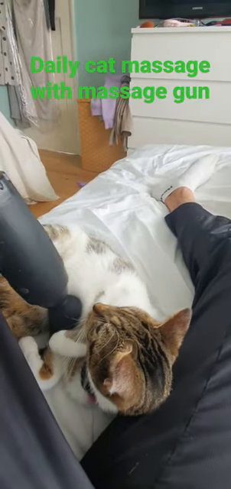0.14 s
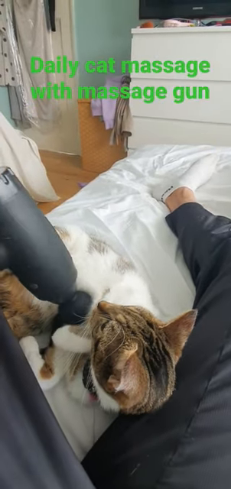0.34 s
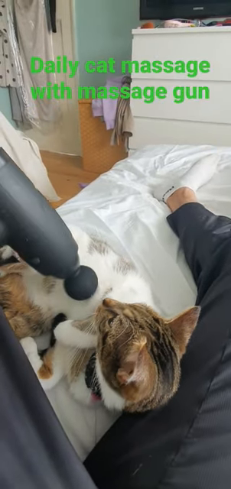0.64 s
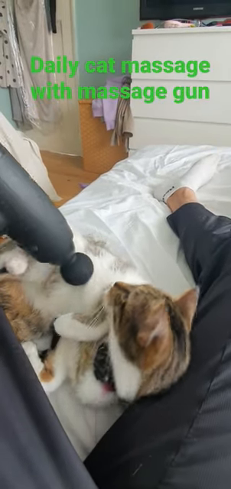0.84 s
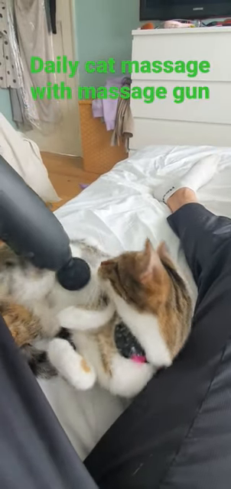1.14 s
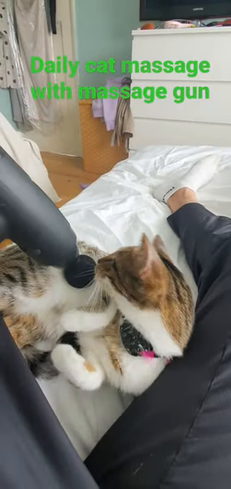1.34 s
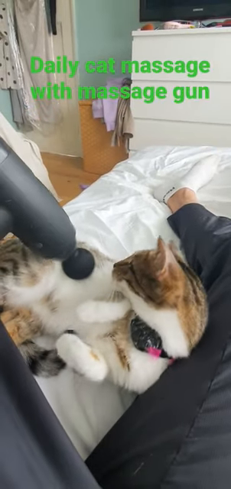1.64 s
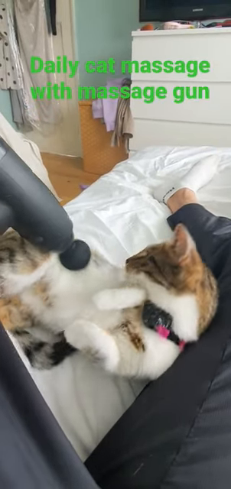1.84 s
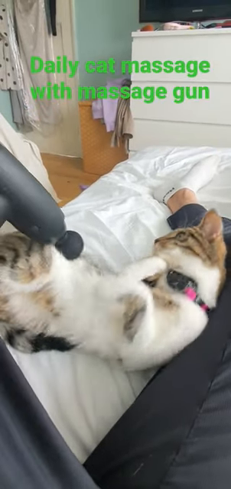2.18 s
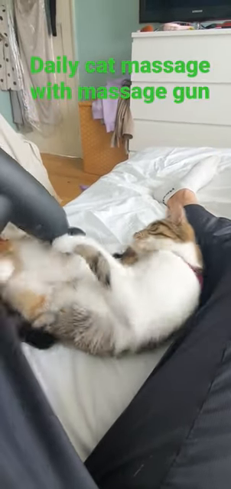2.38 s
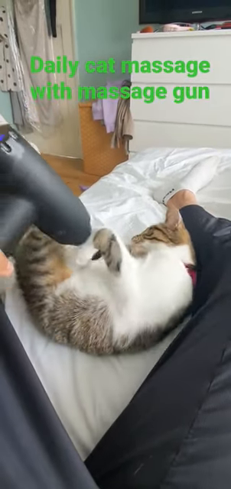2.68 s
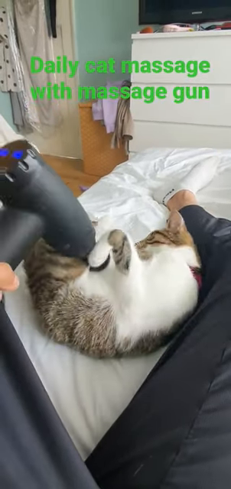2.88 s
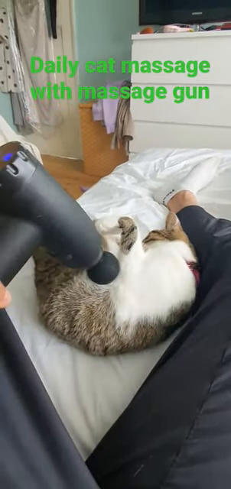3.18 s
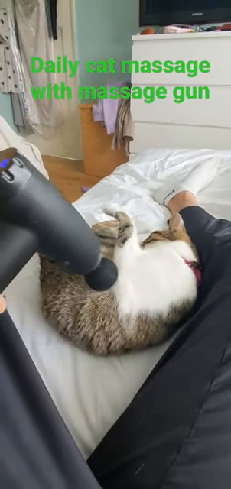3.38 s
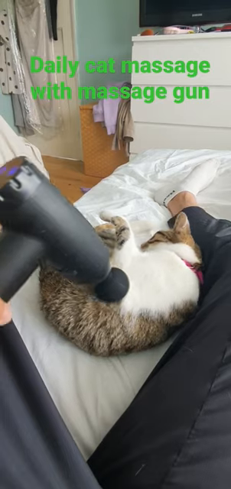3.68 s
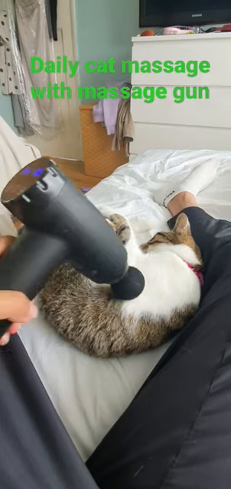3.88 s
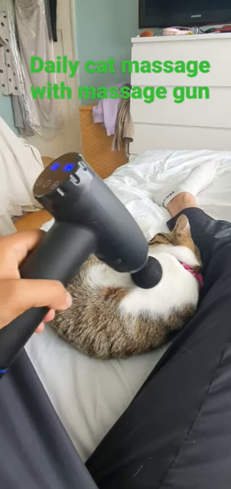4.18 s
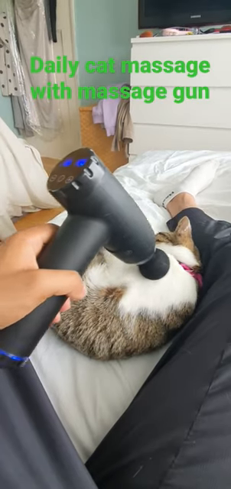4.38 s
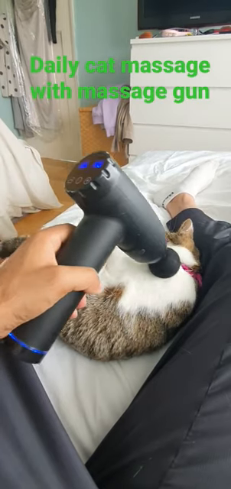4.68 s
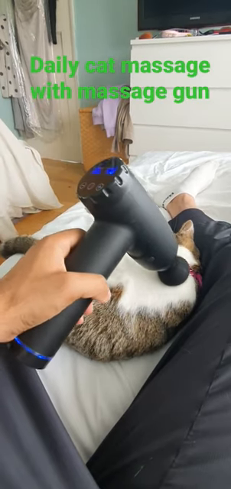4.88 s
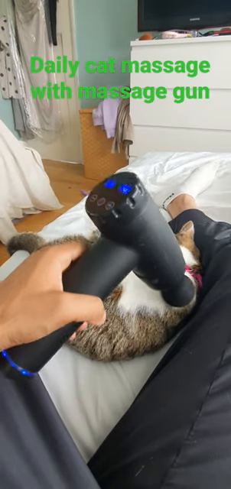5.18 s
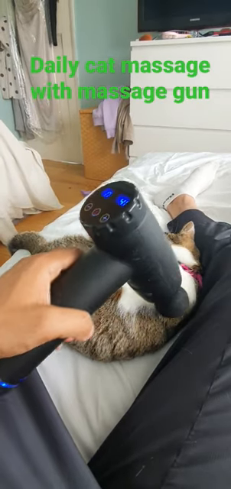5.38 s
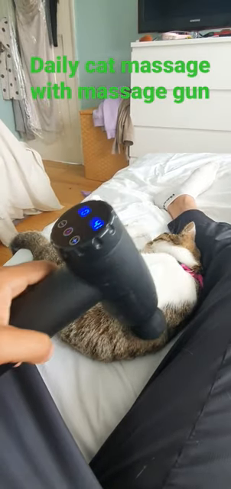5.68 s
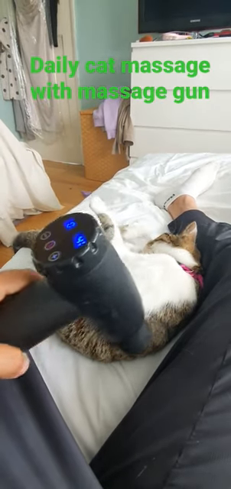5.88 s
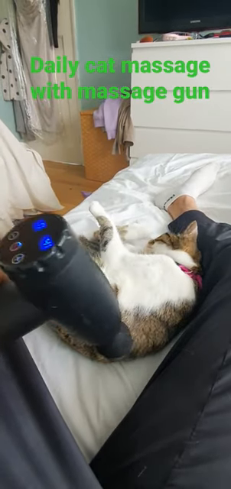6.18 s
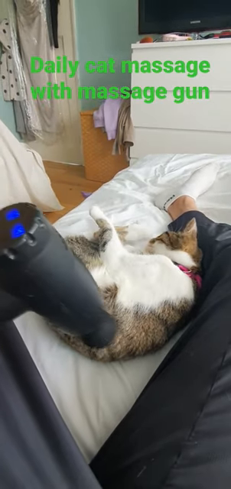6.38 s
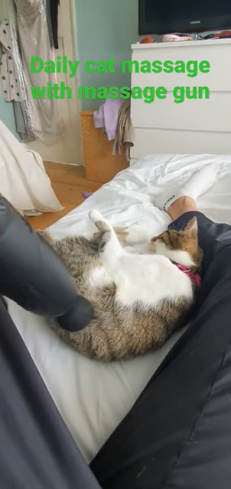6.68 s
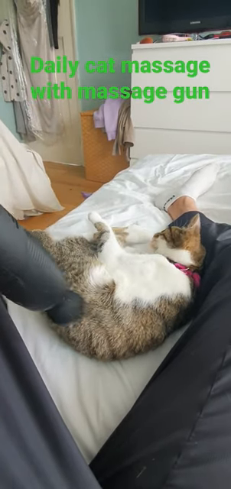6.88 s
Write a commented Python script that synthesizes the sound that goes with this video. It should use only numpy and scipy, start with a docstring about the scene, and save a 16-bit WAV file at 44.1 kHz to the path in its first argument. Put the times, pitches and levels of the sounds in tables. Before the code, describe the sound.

A massage gun runs throughout, close to a phone microphone in a small, soft bedroom. Its buzzy hum flutters about thirty times a second and wavers slightly in speed. Just after one second the head catches in a quick run of slaps; around two and a half seconds bedding rustles and crackles as a cat rolls, followed by a tiny snap and a harder clacking burst near three. Afterwards the hum continues, its whine brighter near the end.

```python
"""A massage gun hums at about 31 strokes a second while it is moved over a cat on a bed.
Its crank drives all its tones: the speed hunts up and down, and the gears rattle once a turn.
Twice the ball head catches and slaps in time with the strokes: decaying modes, with a short room tail.
The cat rolls over on the bedding: shaped noise hisses, crackles and gives a small snap.
A phone listens from close by in a bedroom, through two ports and a band limit."""
import sys
import numpy as np
from scipy import signal
from scipy.fft import rfft, irfft
from scipy.io import wavfile

SR = 44100
rng = np.random.default_rng(int(sys.argv[2]) if len(sys.argv) > 2 else 0)


def inscribe(sig):
    """Save sig as 16-bit PCM at rate SR to the path in sys.argv[1].

    A 1-D sig is mono; a 2-D sig holds one channel per row.
    Samples are clipped to [-1, 1] before scaling.
    """
    pcm = np.round(np.clip(np.atleast_2d(sig).T, -1, 1) * 32767)
    wavfile.write(sys.argv[1], SR, pcm.astype(np.int16))


N = 310464
TIME = np.arange(N) / SR

# crank speed under a hunting control: time_s, mean_turns_per_s, hunt_depth_turns_per_s, hunts_per_s
SPEED_HUNTING = [(0.0, 31.8, 0.59, 3.16), (0.52, 31.18, 0.03, 3.57), (0.96, 31.63, 0.5, 3.0),
                 (1.4, 31.05, 0.11, 3.73), (1.49, 32.02, 0.11, 3.85), (1.94, 31.27, 0.54, 2.78),
                 (2.37, 31.77, 0.3, 4.07), (2.69, 31.54, 1.01, 2.88), (3.13, 31.24, 0.0, 3.89),
                 (3.44, 31.58, 0.53, 3.01), (4.11, 31.5, 0.32, 3.43), (4.66, 31.32, 0.38, 3.35),
                 (5.19, 31.87, 0.36, 3.22), (5.52, 31.12, 0.05, 3.69), (5.85, 31.75, 0.47, 3.43),
                 (7.04, 31.7, 0.33, 3.05)]
# how the gun is held: time_s, nearness_gain_db (each tone takes a share), housing_turn (about -1 to 1)
GUN_POSE = [(0, 1.5, 0.33), (.45, 2.5, 0.11), (.9, -1.5, -0.035), (1.6, -3, 0.28), (2.1, -4, -0.54),
            (3, -3, -0.59), (3.7, -1.5, 0.38), (4.8, -5.5, -0.066), (5.8, 2, -0.39), (6.4, 4, -0.63),
            (7.04, 2, -0.45)]
# phase lead of the left port over the right: freq_hz, lead_rad
PORT_LEAD = [(100, -.1), (315, .3), (590, -.6), (630, 1.6), (662, 0), (720, 1.6), (755, -.3), (790, .5),
             (830, 2), (1350, 1.2), (1550, 0), (3450, 1.4)]


def amp(db):
    """Decibels to gain."""
    return 10 ** (np.asarray(db) / 20)


def evened(x):
    """Scales to rms 1."""
    return x / np.sqrt(np.mean(x ** 2) + 1e-20)


def read(points, hz):
    """Reads a table on a log-frequency axis."""
    f, value = np.transpose(points)
    return np.interp(np.log(hz + 1), np.log(f + 1), value)


def curves(rows):
    """Every column of a time table, at each sample."""
    s, *columns = np.transpose(rows)
    return [np.interp(TIME, s, c) for c in columns]


def swells(rows):
    """Summed gain of gestures that each swell and fade like a bell curve."""
    return sum(amp(db) * np.exp(-((TIME - mid_s) / half_s) ** 2) for mid_s, db, half_s in rows)


def add(mix, s, sound):
    """Mixes a stereo sound in at time s."""
    part = mix[:, round(s * SR):][:, :sound.shape[1]]
    part += sound[:, :part.shape[1]]


def pan(left_db):
    """Gains of the two ports for a left-right level difference."""
    return amp([[left_db / 2], [-left_db / 2]])


def noise(spectrum, same):
    """Coloured stereo noise of rms 1; same is the likeness of the ports."""
    a, b = rfft(rng.standard_normal((2, N)))
    same = np.clip(same, -1, 1)
    pair = np.array([a, same * a + np.sqrt(1 - same ** 2) * b])
    colour = amp(read(spectrum, np.fft.rfftfreq(N, 1 / SR)))
    return evened(irfft(pair * colour, N))


def wander(hz):
    """Smooth chance of rms 1, up to about hz."""
    f = np.fft.rfftfreq(N, 1 / SR)
    return evened(irfft(rfft(rng.standard_normal(N)) / (1 + (f / hz) ** 4), N))


def room_air():
    """The faint hiss of the room: steady coloured noise."""
    # freq_hz, relative_db_per_hz
    air_spectrum = [(100, 10), (2500, 21), (5000, 11.5), (7500, 13), (8800, -4), (15000, -12)]
    return noise(air_spectrum, same=0.091) * amp(-79) * pan(16.2)


def bedroom(x, size=SR // 2):
    """A short diffuse tail, each band dying at its own speed."""
    # decay of the room: freq_hz, t60_s
    room_decay = [(100, 0.16), (1000, 0.13), (4000, 0.29), (12000, 0.16)]
    taps = rng.standard_normal((2, size)) * (rng.random((2, size)) < .08)
    hz, t, z = signal.stft(taps, SR, nperseg=256)
    decay = amp(-60 * t / read(room_decay, hz)[:, None])
    tail = signal.istft(z * decay, SR, nperseg=256)[1]
    tail *= np.minimum(np.arange(tail.shape[1]) / (0.006 * SR), 1)  # 6 ms onset
    return signal.fftconvolve(x, tail / np.linalg.norm(tail[0]), axes=1)[:, :N]


def rustle():
    """Fur and cloth hiss with a fine grain as they slide; the head never stops brushing the fur."""
    # cat or gun moves: middle_s, relative_level_db, half_length_s
    slide_rows = [(1.4, -80, 0.17), (2.08, -76, 0.16), (2.44, -61.5, 0.12), (2.65, -80, 0.2),
                  (5.1, -89, .15), (6.45, -85.5, 0.27)]
    # freq_hz, relative_db_per_hz
    fur_spectrum = [(300, -4), (1200, 12.5), (2500, 6), (4500, 2.5), (7000, 7), (9000, -0.5), (15000, 0)]
    brush_db = -79  # on the scale of the slides
    slide = amp(brush_db) + swells(slide_rows)
    grain = amp(9 + 1.37 * wander(110))
    return noise(fur_spectrum, same=0) * slide * grain * pan(-6.0)


def scuffle():
    """Creases of the bedding give way under the cat in many small grains."""
    # middle_s, relative_level_db, half_length_s
    crease_rows = [(2.45, -60, .05), (2.545, -44.5, 0.013), (2.68, -48.5, 0.024), (5.21, -54.5, 0.11)]
    # freq_hz, relative_db_per_hz
    crackle_spectrum = [(60, -28), (170, 20), (500, 8), (1100, 15), (1800, 4), (3000, -6), (6000, -15),
                        (12000, -25)]
    grains_per_s, grain_decay_s = 700, 0.0012  # decay of the power
    strength = amp(2.7 * np.minimum(rng.exponential(1, N), 4))
    grains = (rng.random(N) < grains_per_s / SR) * strength
    grain_power = signal.lfilter([1], [1, -np.exp(-1 / (grain_decay_s * SR))], grains ** 2)
    crackle = noise(crackle_spectrum, same=0.13) * evened(np.sqrt(grain_power))
    return crackle * swells(crease_rows) * pan(-1.5)


def snaps(size=1500):
    """Very short bright cracks: bursts of decaying noise."""
    # start_s, relative_level_db
    snap_rows = [(2.826, -67), (2.9216, -51), (2.929, -45), (4.92, -65)]
    # freq_hz, relative_db_per_hz
    snap_spectrum = [(1500, -36), (2900, 5.5), (5500, 6.5), (8500, -8.5), (15000, -12)]
    out, t = np.zeros((2, N)), np.arange(size) / SR
    crack = noise(snap_spectrum, same=0.16) * pan(-4.5)
    for s, db in snap_rows:
        burst = crack[:, round(s * SR):][:, :size]
        add(out, s, burst * amp(db + 3.5 - 60 * t / 0.029))  # t60 29 ms
    return out


def crank_speed():
    """Turns per second: the speed control swings around its mean."""
    first_surge = .603  # share of a hunt that passes before it
    mean, depth, rate = curves(SPEED_HUNTING)
    return mean + depth * np.cos(2 * np.pi * (np.cumsum(rate) / SR - first_surge))


def slaps():
    """Time and levels of every slap: out and back each stroke, growing to the hardest and dying away."""
    # the head catches; a graze has one stroke: first_s, hardest_s, last_s,
    # tick_db, clack_db, ring_db, thud_db of the hardest, return_offset_db
    catch_rows = [(1.1964, 1.1964, 1.1964, -60, -47, -43, -54, -7.5),
                  (1.2245, 1.2551, 1.2551, -63, -56, -49, -46, -9.5),
                  (1.289, 1.289, 1.3221, -47, -44, -42, -42, 0.5),
                  (1.3534, 1.379, 1.4198, -39, -45, -46, -38.5, 3),
                  (2.5585, 2.5585, 2.5585, -64, -52.5, -54, -60, -8.5),
                  (2.598, 2.598, 2.632, -64, -55, -47, -63, -18),
                  (2.6801, 2.6801, 2.6801, -65, -51.5, -60, -62, -12),
                  (2.8255, 2.8258, 2.8258, -67, -57, -69, -53, -25),
                  (3.0972, 3.0973, 3.1337, -66, -42, -54, -44.5, -2.5),
                  (3.1607, 3.178, 3.2565, -49, -32, -63, -44, 0.5)]
    # fade either side of the hardest: one entry each for tick, clack, ring, thud [dB per s]
    fade_db_per_s = [200, 103, 30, 70]
    # duller return slap before its offset: tick, clack, ring, thud [dB]
    return_slap_db = [-51.5, -46, -42, -44.5]
    return_delay_s = .0113
    strokes_per_s = crank_speed().mean()
    for first, hardest, last, *out_db, back_db in catch_rows:
        for s in np.linspace(first, last, round((last - first) * strokes_per_s) + 1):
            fade_db = np.array(fade_db_per_s) * abs(s - hardest)
            yield s, out_db - fade_db
            yield s + return_delay_s, np.array(return_slap_db) + back_db - fade_db


def knocks(size=4000):
    """Each slap ticks and clacks almost at once; the housing and the soft body answer a moment later."""
    # part (1 tick, 2 clack, 3 housing ring, 4 thud), nominal_hz, relative_level_db, t60_s
    mode_rows = [(1, 3080, 4.5, 0.0035), (1, 3700, -0.5, 0.0056), (1, 4630, 8, 0.0029),
                 (1, 5670, -1.5, 0.0079), (1, 6700, -7, 0.0053), (2, 1255, 3, 0.022), (2, 1610, 4, 0.015),
                 (2, 2150, 1, 0.011), (2, 2650, 4, 0.0045), (3, 400, -11.5, 0.01), (3, 687, 1, 0.034),
                 (3, 930, 1, 0.015), (4, 107, 0, 0.034), (4, 210, 3.5, 0.013), (4, 300, -7, 0.036)]
    out, t = np.zeros((2, N)), np.arange(size) / SR
    # seconds, one for each part
    delays_s, rises_s = [0, 0.00018, 0.00048, 0.002], [.00008, .0005, 0.00078, 0.00118]
    for s, levels_db in slaps():
        parts = np.zeros((len(levels_db), 2, size))
        for column, hz, db, t60 in mode_rows:
            part = round(column) - 1
            detune, angle, side = rng.standard_normal(3)
            age = np.maximum(t - delays_s[part], 0)
            apart = np.array([[.5], [-.5]]) * (read(PORT_LEAD, hz) + 0.86 * side)
            mode_hz = hz * (1 + 0.033 * np.clip(detune, -2, 2))
            ring = np.sin(2 * np.pi * mode_hz * age + 1.01 * angle + apart)
            attack = 1 - np.exp(-(age / rises_s[part]) ** 2)
            parts[part] += ring * amp(db - 60 * age / t60) * attack
        for part, db, left_db in zip(parts, levels_db, [-2.5, 1.0, 3, -4.5]):
            power = np.mean(np.sum(part ** 2, axis=1)) / (SR / 100)  # over a hundredth of a second
            add(out, s, part / np.sqrt(power) * amp(db) * pan(left_db))
    # the foam head cannot excite the top octave
    return signal.sosfilt(signal.butter(N=4, Wn=7600, fs=SR, output="sos"), out)


def once_a_turn(turns, at, width):
    """A smooth bump at one crank angle."""
    return np.exp(-(np.sin(np.pi * (turns - at)) / (np.pi * width)) ** 2)


def tones(turns, orders, peak_at, scatter, size=4096):
    """Multiples of the crank speed crest together near one crank angle, the weak ones more loosely."""
    # strong multiples: order, left_relative_db, right_relative_db
    strong_rows = [(1, -69.5, -68), (2, -63.5, -59), (3, -65, -67), (4, -72.5, -71.5), (5, -78, -76.5),
                   (7, -71, -69.5), (9, -72, -70), (10, -56.5, -50), (11, -62, -74.5), (13, -77, -102),
                   (16, -93, -66), (19, -67, -80.5), (20, -53.5, -49), (21, -68, -53), (22, -73, -71.5),
                   (23, -81, -75), (24, -61.5, -59), (25, -52, -62), (26, -71, -72), (27, -64.5, -71),
                   (29, -83, -73.5), (30, -66, -60), (31, -74, -76), (35, -65.5, -72), (40, -79, -65.5),
                   (41, -80, -78), (42, -64, -64), (43, -64, -76), (45, -61.5, -72.5), (46, -67.5, -77),
                   (47, -73.5, -79)]
    # weak multiples between and above, before scatter: freq_hz, relative_level_db
    weak_curve = [(180, -78.5), (500, -84.5), (900, -76.5), (1200, -76), (1600, -83), (1800, -101),
                  (2020, -80.5), (2400, -108.5), (3200, -91.5), (3430, -82), (3700, -98.5), (4200, -86.5)]
    notch_hz = 715  # between its two main resonances the housing's motion changes sign
    hz = orders * np.mean(np.array(SPEED_HUNTING)[:, 1])
    strong = {round(k): (left, right) for k, left, right in strong_rows}
    weak_db = read(weak_curve, hz)[:, None] + rng.standard_normal((len(orders), 2))
    level = amp([strong.get(k, db) for k, db in zip(orders, weak_db)]).T
    spread = scatter + np.where(np.isin(orders, list(strong)), 0, 1)
    phase = spread * rng.standard_normal(len(orders)) - 2 * np.pi * orders * peak_at
    phase = phase + np.pi * (hz > notch_hz)
    # the port nearer to a node of the sound field is the one that is out of step
    apart = np.array([[1], [-1]]) * level[::-1] / level.sum(0) * read(PORT_LEAD, hz)
    lines = np.zeros((2, size // 2 + 1), complex)
    lines[:, orders] = level * np.exp(1j * (phase + apart))
    one_turn = irfft(lines) * size / np.sqrt(2)
    grid = np.arange(size + 1) / size
    return np.array([np.interp(turns % 1, grid, np.r_[c, c[0]]) for c in one_turn])


def bearing(turns):
    """A bearing hisses, and sings near one pitch, louder during part of each turn."""
    # time_s, relative_level_db
    whine_rows = [(0, -74), (.6, -75.5), (1.5, -89), (2.2, -86), (3, -74.5), (4.4, -69.5), (5.2, -73),
                  (6.2, -67), (6.55, -63), (7.04, -64)]
    # freq_hz, relative_db_per_hz
    hiss_spectrum = [(2200, -32), (2900, -8), (3300, -5), (3450, -1.5), (3600, 0), (3850, -3), (4400, -16),
                     (6000, -23.5)]
    whine_db, = curves(whine_rows)
    hiss_throb = 1 + 0.76 * once_a_turn(turns, at=0.77, width=0.13)
    hiss = noise(hiss_spectrum, same=0.047) * amp(-73.0) * hiss_throb
    hiss = hiss * amp(0.29 * (whine_db - whine_db.mean()))
    angle = 2 * np.pi * np.cumsum(3440 + 28 * wander(41.3)) / SR
    song_throb = 0.41 + once_a_turn(turns, at=0.67, width=0.21)
    song = np.sin(angle + np.array([[.7], [-.7]])) * song_throb
    return (hiss + evened(song) * amp(whine_db - 4.0)) * pan(-8.5)


def gears(turns):
    """Play in the gears is taken up once a turn: a soft rattle that grows as the gun comes near."""
    # freq_hz, relative_db_per_hz
    grind_spectrum = [(200, -5.5), (330, 8.5), (520, -2.5), (680, 10), (800, 7), (1010, -10), (1130, -5.5),
                      (1380, 5.5), (1600, -5.5), (2050, -6), (2400, -30), (4000, -36), (8000, -55)]
    near_db = curves(GUN_POSE)[0]
    rattle = tones(turns + .0004 * wander(30), np.arange(34, 135), peak_at=.655, scatter=.45)
    rattle = rattle * amp(-0.8 + 0.53 * wander(33))
    throb = 1 + 0.5 * once_a_turn(turns, at=0.46, width=0.39)
    grind = noise(grind_spectrum, same=0.054) * amp(-60.0) * throb
    return (rattle + grind * pan(0.69)) * amp(0.22 * near_db)


def piston(turns):
    """Each stroke shakes the cat and the bed; the soft load makes no two alike."""
    # shaking of the bed as the head presses in: time_s, relative_change_db
    shake_rows = [(0, -1), (.33, -0.5), (.46, 11), (.6, 7), (.8, -4), (1.9, 1), (3.3, 7), (3.7, 1),
                  (5.1, 0), (5.9, -8), (6.35, 8.5), (7.04, 3.5)]
    # freq_hz, relative_db_per_hz
    rumble_spectrum = [(15, -18), (40, -2), (65, 1), (115, 8.5), (170, -3.5), (240, -1.5), (400, -15),
                       (1000, -53)]
    shake_db, = curves(shake_rows)
    strokes = tones(turns + .015 * wander(6), np.arange(1, 5), peak_at=.3, scatter=1.2)
    rumble = noise(rumble_spectrum, same=0.91) * amp(-63 + 0.13 * shake_db) * pan(-3.5)
    return strokes * amp(shake_db - 3.5 + 2.0 * wander(7.9)) + rumble


def motor(turns, surge):
    """The hum, with main tones at 10, 20 and 25 times the crank speed; it throbs once a turn."""
    # tones that swell and fade, mostly at the right port, as the gun is turned: order
    aimed_orders = [10, 20, 21, 25]
    # their answers: offset_db, share_of_nearness_gain, db_per_unit_of_turn, db_per_extra_turn_per_s
    aim_rows = [(-0.02, 0.82, -0.5, 2), (-0.5, 0.083, 3.5, 3), (0.25, 1, 9.5, 2.5), (-1.6, 1, -5.5, -1)]
    left_share = 0.11  # of the pose changes in dB
    unsteady = turns + 0.0012 * wander(25)
    near_db, facing = curves(GUN_POSE)
    low, high = np.split(np.setdiff1d(np.arange(5, 34), aimed_orders), [13])
    hum = tones(unsteady, low, peak_at=.7, scatter=1.0) * amp(-1.5 + 2.0 * wander(7.7))
    sidebands = tones(unsteady + .0012 * wander(4), high, peak_at=.955, scatter=.4)
    # the throb fades as the gun moves off or turns away
    hum += sidebands * amp(-0.7 + 0.75 * near_db + 2.1 * facing + 1.37 * wander(5.1))
    for order, (tone_db, near_share, facing_db, surge_db) in zip(aimed_orders, aim_rows):
        tone = tones(unsteady, np.array([order]), peak_at=.95, scatter=.1)
        pose_db = near_share * near_db + facing_db * facing
        # a surge pushes the tone along the flank of a housing resonance
        hum += tone * amp(tone_db + surge_db * surge) * amp([left_share * pose_db, pose_db])
    return hum


def gun():
    """All moving parts follow the one crank."""
    speed = crank_speed()
    turns = np.cumsum(speed) / SR
    return piston(turns) + motor(turns, speed - speed.mean()) + gears(turns) + bearing(turns)


def scene():
    """The gun, its slaps in the room, and the cat on the bedding."""
    hits = knocks() + snaps()
    # the bed soaks up the thuds; mostly the bright part comes back from the walls
    bright = signal.lfilter(*signal.butter(1, 700, "high", fs=SR), hits)
    cat = rustle() + scuffle()
    return room_air() + cat + hits + amp(-8) * bedroom(bright) + gun()


def record(dry):
    """The phone's band limit: a steep linear-phase low-pass."""
    edge_hz = 15600
    low_pass = signal.firwin(511, edge_hz, window=("kaiser", 9), fs=SR)
    return signal.oaconvolve(dry, low_pass[None], "same")


dry = scene()
out = record(dry)
inscribe(out)
```